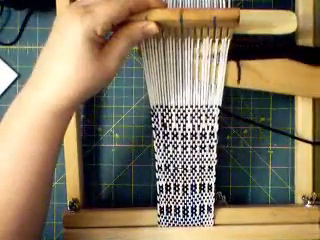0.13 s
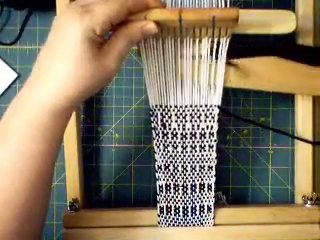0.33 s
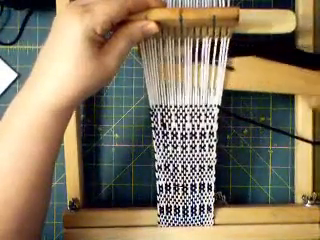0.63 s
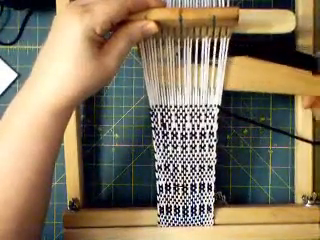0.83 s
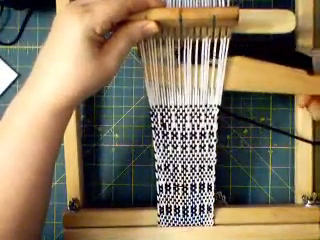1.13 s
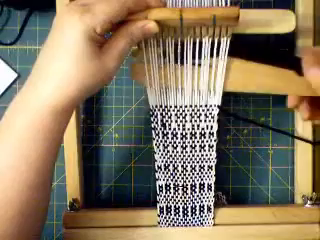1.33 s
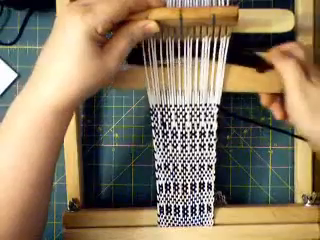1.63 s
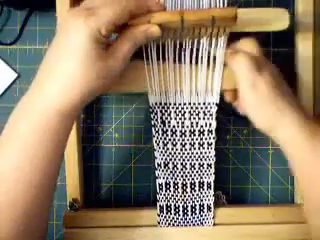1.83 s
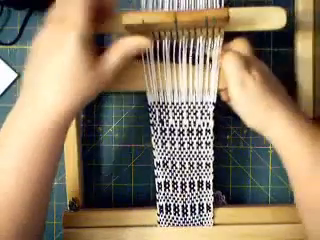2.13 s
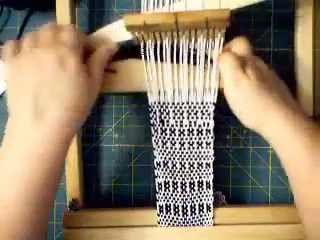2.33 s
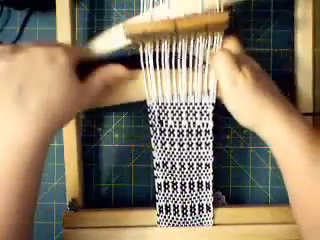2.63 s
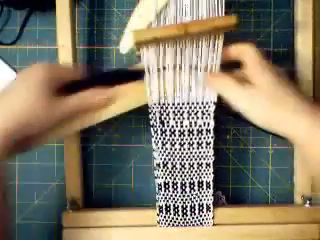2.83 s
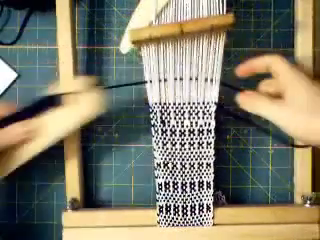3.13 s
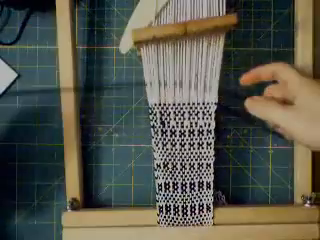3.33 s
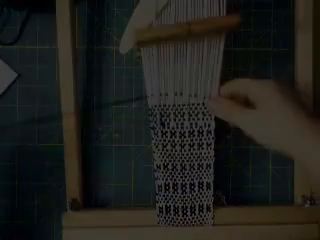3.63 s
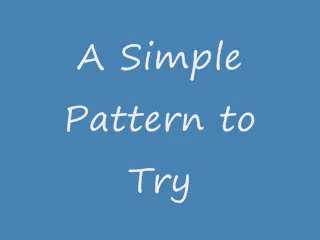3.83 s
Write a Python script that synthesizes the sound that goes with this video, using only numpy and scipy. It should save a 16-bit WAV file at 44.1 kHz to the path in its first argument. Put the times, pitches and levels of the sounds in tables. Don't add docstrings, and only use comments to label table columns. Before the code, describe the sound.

Sharp hard wooden clack on a small loom after faint scraping, rattling and yarn rustle

```python
import sys
import numpy as np
from scipy import signal
from scipy.fft import rfft, irfft
from scipy.io import wavfile

SR = 44100
rng = np.random.default_rng(int(sys.argv[2]) if len(sys.argv) > 2 else 0)


def dump(signal):
    limited = np.clip(np.atleast_2d(signal).T, -1, 1)
    pcm = np.round(limited * 32767).astype(np.int16)
    wavfile.write(sys.argv[1], SR, pcm)


def gain_from_db(level_db):
    decades = np.asarray(level_db, float) / 20
    return 10 ** decades


N = 176400

# pitch_hz, width_hz, level_db
STICK_MODES = [(1600, 200, -19.5), (2340, 68, -5.5), (3606, 55, -4), (4120, 70, -14), (5100, 106, -2),
               (5500, 210, -14.5), (6760, 250, -16.5), (7300, 120, -20)]


def rms_one(x):
    return x / np.sqrt(np.mean(x ** 2) + 1e-20)


def coloured(x, points):
    hz = np.maximum(np.fft.rfftfreq(len(x), 1 / SR), 1)
    at_hz, db = np.transpose(points)
    gain = gain_from_db(np.interp(np.log(hz), np.log(at_hz), db))
    gain = gain * (hz > 15)
    return rms_one(irfft(rfft(x) * gain, len(x)))


def ring(x, hz, t60):
    radius = gain_from_db(-60 / (t60 * SR))
    angle = 2 * np.pi * hz / SR
    feedback = [1, -2 * radius * np.cos(angle), radius * radius]
    return signal.lfilter([0, np.sin(angle)], feedback, x + 1e-18)


def t60_of(width_hz):
    return np.log(1000) / (np.pi * width_hz)


def grains(rate, spread_db):
    sizes = gain_from_db(spread_db * np.minimum(rng.exponential(1, N), 4))
    signs = rng.choice([-1, 1], N)
    return rms_one(sizes * signs * (rng.random(N) < rate / SR))


def room():
    # pitch_hz, level_db (per Hz)
    air = [(20, -49.5), (45, -36.5), (90, -26), (190, -33), (600, -44.5), (2000, -50.5), (6000, -61),
           (11000, -68)]
    # pitch_hz, width_hz, level_db
    hum = [(62.4, 3.2, -57), (113.2, 5.3, -51), (160, 42, -50.5), (340, 15, -68.5), (535.7, 7.9, -70.5),
           (676, 5, -78)]
    # pitch_hz, level_db (rms)
    whine = [(1024, -73), (2048, -75), (3072, -79.5), (4096, -79.5)]
    out = gain_from_db(-53) * coloured(rng.standard_normal(N), air)
    for hz, width_hz, db in hum:
        rung = ring(rng.standard_normal(N + SR), hz, t60_of(width_hz))[SR:]
        out += gain_from_db(db) * rms_one(rung)
    for hz, db in whine:
        cycles = hz * np.arange(N) / SR + rng.random()
        out += gain_from_db(db) * np.sqrt(2) * np.sin(2 * np.pi * cycles)
    return out


def yarn():
    # time_s, level_db, share of thin bright rustle (0-1)
    slide = [(0, -67, 0.07), (.6, -63.5, 0.5), (.8, -68, 0.4), (1.09, -76, 0), (1.14, -61.5, 0.73),
             (1.65, -57.5, 0.35), (1.8, -62.5, 0.56), (2.3, -61.5, 0.8), (2.38, -66.5, 0.3),
             (2.5, -57.5, 0.46), (2.585, -47, .25), (2.655, -52.5, 0.93), (2.76, -50, 0.8),
             (2.87, -57.5, 0.37), (3.1, -57.5, .4), (3.35, -59.5, 0.26), (3.45, -74.5, .4),
             (4, -68.5, 0.37)]
    # pitch_hz, level_db (per Hz)
    full_colour = [(530, -47), (900, -5), (1010, -5.5), (1090, -3), (3720, -6), (6820, -15.5), (10500, -21),
                   (13600, -45), (22000, -120)]
    # pitch_hz, level_db (per Hz)
    thin_colour = [(1200, -25.5), (3300, -5), (3850, -0.5), (4300, -4), (5000, -5.5), (5700, -1.5),
                   (6800, -5), (10500, -23.5)]
    fibres_per_s, flicker_db, flicker_step = 6000, 2, 900
    s, db, share = np.transpose(slide)
    t = np.arange(N) / SR
    thin = np.clip(np.interp(t, s, share), 0, 1)
    full_drag = coloured(grains(fibres_per_s, spread_db=3.5), full_colour)
    rustle = coloured(grains(fibres_per_s, spread_db=-0.5), thin_colour)
    drag = np.sqrt(1 - thin) * full_drag + np.sqrt(thin) * rustle
    knots = N // flicker_step + 2
    flicker = np.interp(np.arange(N) / flicker_step, np.arange(knots), rng.standard_normal(knots))
    return gain_from_db(np.interp(t, s, db) + flicker_db * flicker) * drag


def bumps():
    # start_s, peak_db, pitch_hz, t60_s
    pushes = [(1.379, -38, 490, 0.075), (1.813, -39, 349, 0.083), (2.026, -43, 340, .07),
              (2.238, -43.5, 328, 0.088), (2.525, -45, 340, 0.09), (2.557, -34.5, 338, 0.14),
              (2.609, -43, 326, .06), (2.688, -36, 480, 0.053), (2.68, -35, 233.8, .08),
              (2.825, -40, 340, 0.12), (3.046, -41.5, 340, 0.081)]
    out, t = np.zeros(N), np.arange(SR // 5) / SR
    for s, db, hz, t60 in pushes:
        soft_start = np.minimum(t / 0.0099, 1)
        thud = gain_from_db(db - 60 * t / t60) * np.sin(2 * np.pi * hz * t)
        out[int(s * SR):][:len(t)] += thud * soft_start
    return out


def ticks():
    # start_s, peak_db, centre_hz
    touches = [
        (1.827, -44.5, 6000),
        (1.828, -45, 2600),
        (1.985, -38.5, 5100),
        (2.019, -44.5, 1080),
        (2.02, -43, 4000),
        (2.0919, -40.5, 1970),
        (2.23, -42.5, 1600),
        (2.492, -38, 5060),
    ]
    out, t = np.zeros(N), np.arange(SR // 5) / SR
    for s, db, hz in touches:
        burst = rng.standard_normal(len(t)) * gain_from_db(-60 * t / 0.021)
        rung = ring(burst, hz, 12.4 / hz)
        out[int(s * SR):][:len(t)] += gain_from_db(db) * rung / np.abs(rung).max()
    return out


def squeak(slips):
    # time_s, pitch_hz, level_db
    glide = [
        (1.86, 4990, -66),
        (1.899, 5103, -55.5),
        (1.939, 5500, -53),
        (1.975, 5793, -52),
        (1.995, 5300, -56.5),
        (2.06, 5490, -70),
        (2.08, 5500, -91.5),
    ]
    t = np.arange(N) / SR
    s, hz, db = np.transpose(glide)
    low_pass = signal.butter(1, 116, fs=SR, output="sos")
    ragged = rms_one(signal.sosfilt(low_pass, slips))
    tone = np.sin(2 * np.pi * np.cumsum(np.interp(t, s, hz)) / SR)
    return gain_from_db(np.interp(t, s, db, -np.inf, -np.inf)) * ragged * tone


def stick():
    # start_s, length_s, level_db, brightness (dB per octave)
    scrapes = [(1.856, 0.024, -52.5, 2), (1.878, .018, -50, 1), (1.894, 0.063, -55, 3),
               (1.954, 0.031, -58, 0), (2.004, .016, -53.5, -11.5), (2.113, 0.011, -49, -5),
               (2.173, 0.068, -57.5, -3), (2.21, 0.023, -48, 1.5), (2.235, 0.013, -43.5, 0.8),
               (2.252, 0.051, -53, 5.5), (2.299, 0.023, -52, 4.3), (2.319, 0.012, -45, 1.5)]
    attack_s, release_s, mode_spread_db, rasp_db = 0.002, 0.0096, 2.5, -17.5
    t = np.arange(N) / SR
    slips = grains(2500, spread_db=2.5)
    weights = mode_spread_db * rng.standard_normal((len(scrapes), len(STICK_MODES)))
    strokes = []
    for s, length, db, _ in scrapes:
        rise = (t - s) / attack_s
        fall = (s + length - t) / release_s + 0.5
        strokes.append(gain_from_db(db) * np.clip(np.minimum(rise, fall), 0, 1))
    strokes = np.array(strokes)
    tilts = np.array(scrapes)[:, 3]
    rasp = coloured(slips, [(600, -24), (1500, -1), (6000, 0.5), (10000, -12.5)])
    out = gain_from_db(rasp_db) * strokes.sum(axis=0) * rasp
    for (hz, width_hz, db), weight in zip(STICK_MODES, weights.T):
        t60 = t60_of(width_hz)
        push = gain_from_db(weight + tilts * np.log2(hz / 3600)) @ strokes
        even_out = np.sqrt(4 * np.log(1000) / (t60 * SR))
        out += gain_from_db(db - 5) * ring(slips * push, hz, t60) * even_out
    return out + squeak(slips)


def taps():
    # start_s, peak_db, brightness (dB per octave)
    hits = [
        (1.878, -50, 1),
        (2.1155, -38, 0),
        (2.2245, -44, 3),
        (2.2475, -42, -5),
        (2.2975, -42, -10),
        (2.326, -41.5, 2.5),
    ]
    s, db, tilt = np.transpose(hits)
    out = np.zeros(N)
    for hz, width_hz, level_db in STICK_MODES:
        clicks = np.zeros(N)
        clicks[(s * SR).astype(int)] = gain_from_db(db + level_db + tilt * np.log2(hz / 3600))
        out += ring(clicks, hz, t60_of(width_hz))
    return signal.sosfilt(signal.butter(2, 1200, "high", fs=SR, output="sos"), out)


def clack():
    # start_s, peak_db, brightness (dB per octave)
    contacts = [
        (2.669, -26, 3.5),
        (2.671, -17, 2),
        (2.6747, -3, 2),
        (2.6791, -8, 2.5),
        (2.684, -13, -2.5),
        (2.6879, -17.5, 2.3),
        (2.6916, -17, -1.5),
        (2.699, -23.5, -1),
        (2.7212, -18, -2.5),
    ]
    # pitch_hz, level_db, t60_s
    shuttle = [(596, -28, 0.036), (1208, -14, .015), (1775, -20.5, .015), (2290, -26, .03),
               (2970, -10, .04), (3084, -9, .045), (4122, -7.5, 0.019), (5165, -6, .026),
               (5900, -11.5, 0.012), (6680, -10.5, .018), (7286, -9, 0.014), (7520, -20.5, 0.043),
               (8800, -15.5, 0.016), (9880, -23.5, 0.029)]
    contact_spread_s, body_cut_hz = 0.0008, 850
    crack_db, crack_t60_s, crack_band_hz = -8, 0.036, (2350, 7500)
    tail_db, tail_t60_s, tail_ring_db = -19, 0.2, -4.5

    s, db, tilt = np.transpose(contacts)
    start, t = int(s[0] * SR), np.arange(SR // 2) / SR
    at = (s * SR).astype(int) - start
    body = np.zeros(len(t))
    lucks = rng.standard_normal((len(s), len(shuttle)))
    lags = rng.random((len(s), len(shuttle)))
    for (hz, level_db, t60), luck, lag in zip(shuttle, lucks.T, lags.T):
        late = (lag * contact_spread_s * SR).astype(int)
        clicks = np.zeros(len(t))
        clicks[at + late] = gain_from_db(db + level_db + 1.7 * luck + tilt * np.log2(hz / 4000))
        body += ring(clicks, hz, t60)
    body = signal.sosfilt(signal.butter(2, body_cut_hz, "high", fs=SR, output="sos"), body)

    clicks = np.zeros(len(t))
    clicks[at] = gain_from_db(db + crack_db + tilt)
    crack = signal.fftconvolve(clicks, gain_from_db(-60 * t / crack_t60_s))[:len(t)]
    crack_band = signal.butter(3, crack_band_hz, "band", fs=SR, output="sos")
    crack *= signal.sosfilt(crack_band, rng.standard_normal(len(t)))

    echo = signal.lfilter([0.6], [1, -0.4], rng.standard_normal(len(t)))
    echo = echo * gain_from_db(-60 * t / tail_t60_s) * np.minimum(t / 0.004, 1)
    tail = signal.fftconvolve(crack + gain_from_db(tail_ring_db) * body, echo)[:len(t)]
    tail = gain_from_db(tail_db - 18.5) * tail
    return np.pad(body + crack + tail, (start, N - start - len(t)))


def scene():
    return (room() + yarn() + bumps() + ticks() + stick() + taps() + clack())[None]


def below(x, cut_hz, loss_db=0):
    hz = np.fft.rfftfreq(N, 1 / SR)
    slope = np.clip((hz - cut_hz) / 1500 + 1, 0, 1)
    return irfft(rfft(x) * (hz < cut_hz) * gain_from_db(-loss_db * slope), N)


def half_rate(dry):
    narrow = below(dry, 10700)
    mirrored = narrow * (-1) ** np.arange(N)
    return narrow + gain_from_db(-0.5) * below(mirrored, 12700, 5.5)


def stepped_fade():
    last_sample, step_samples, steps = 172943, 1470, 60
    steps_left = np.ceil((last_sample - np.arange(N)) / step_samples)
    return np.clip(steps_left, 0, steps) / steps


def roll_off(x):
    return signal.sosfilt(signal.butter(12, 12680, fs=SR, output="sos"), x)


def record(dry):
    offset = -0.2385
    fade = stepped_fade()
    hiss = coloured(rng.standard_normal(N), [(300, -4), (3000, -1), (12000, -17.5)])
    hiss = gain_from_db(-80.5) * hiss * (fade > 0)
    mix = (half_rate(dry) + offset) * fade + hiss
    return roll_off(mix)


dry = scene()
out = record(dry)
dump(out)
```